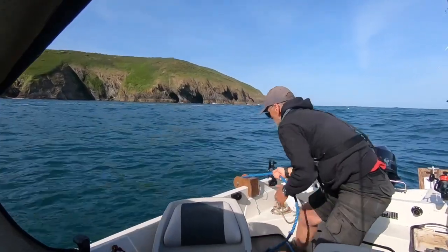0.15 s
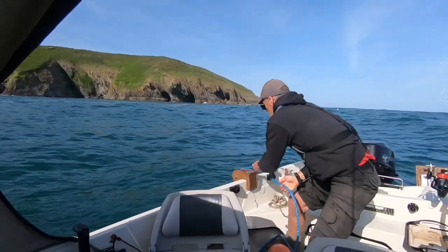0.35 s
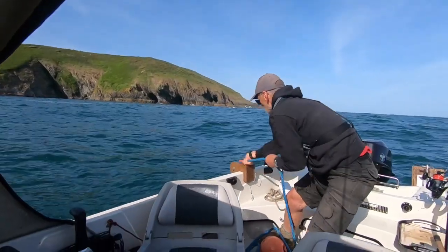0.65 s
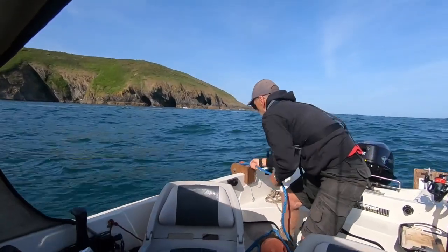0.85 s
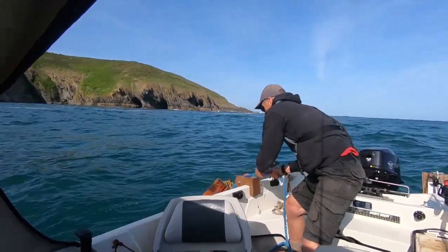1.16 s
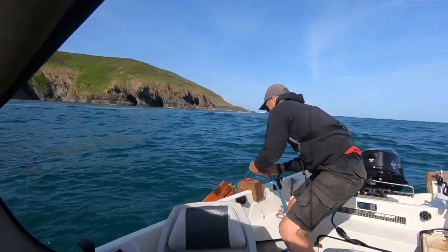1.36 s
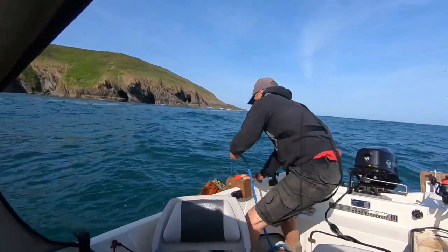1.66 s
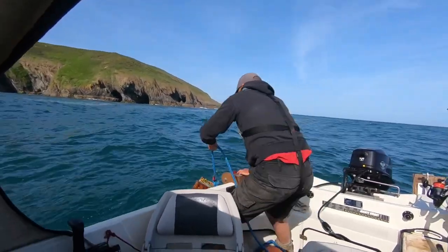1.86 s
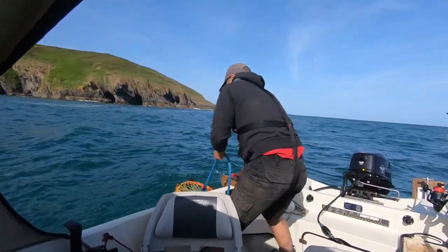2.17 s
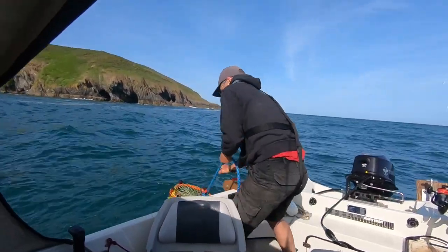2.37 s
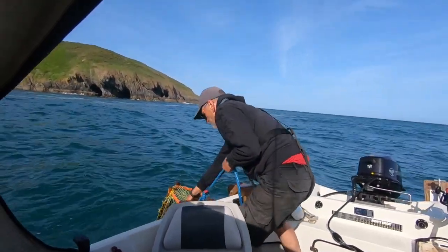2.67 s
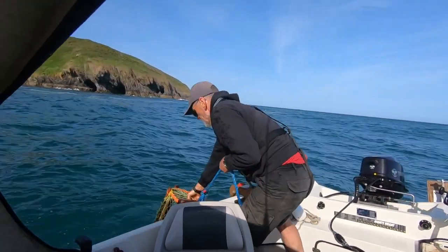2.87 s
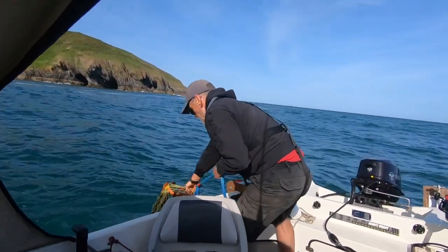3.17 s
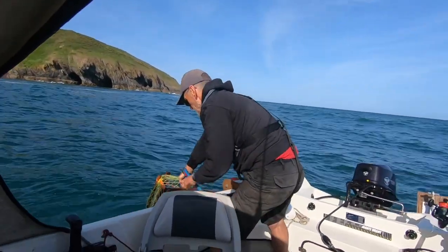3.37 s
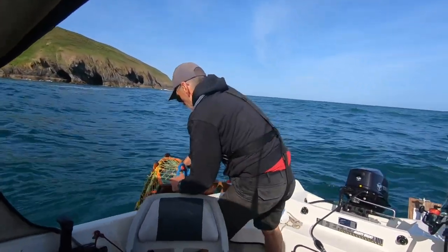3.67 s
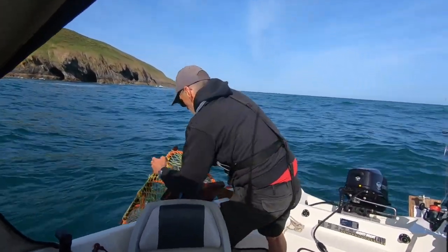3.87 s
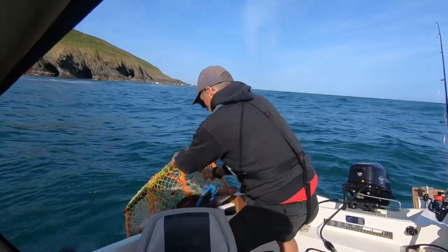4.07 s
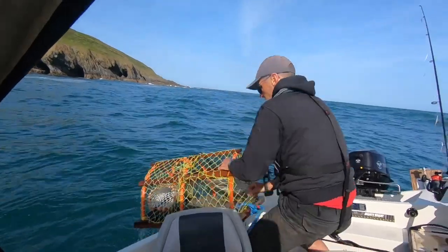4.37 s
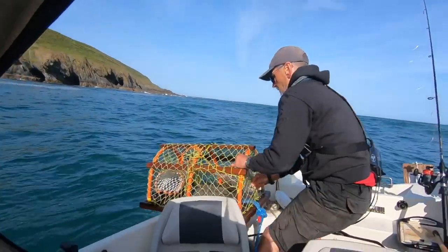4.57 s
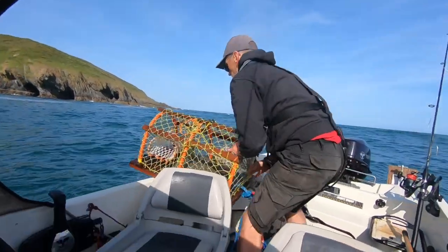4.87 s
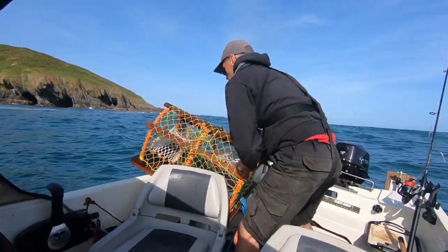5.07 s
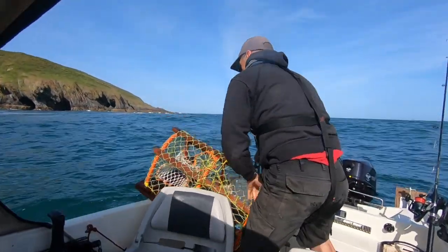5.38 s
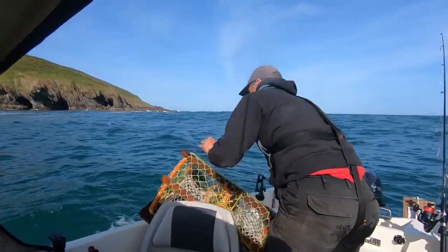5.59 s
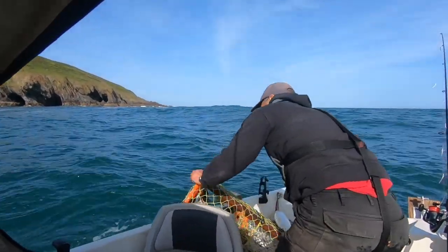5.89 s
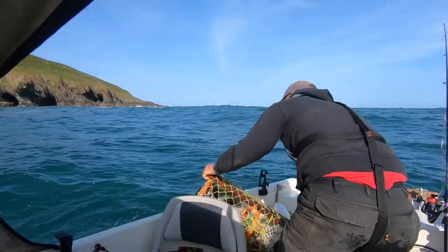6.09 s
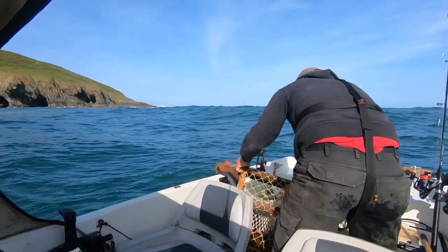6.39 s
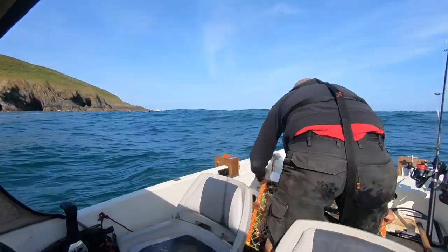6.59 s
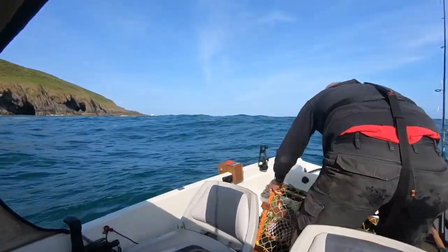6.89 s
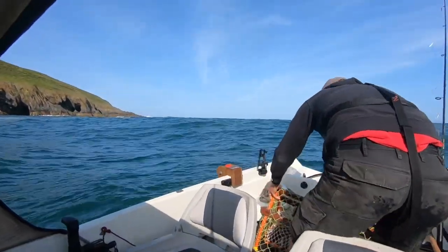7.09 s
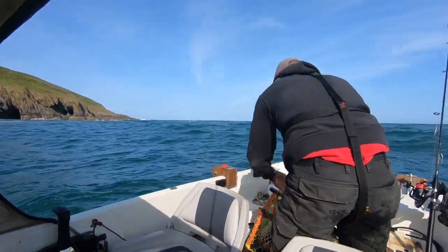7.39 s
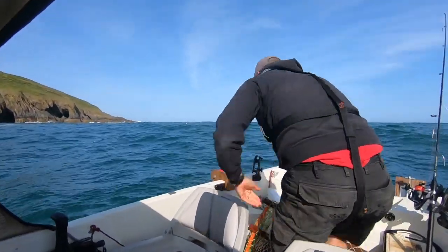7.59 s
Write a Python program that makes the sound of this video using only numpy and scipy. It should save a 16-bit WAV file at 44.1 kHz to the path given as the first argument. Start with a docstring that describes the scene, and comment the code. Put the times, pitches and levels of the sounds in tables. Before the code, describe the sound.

On a small fibreglass boat at sea, wet rope rasps and snaps between isolated hollow knocks. A framed netting trap then comes over the side with juddering scrapes, creaks and a brief squeak, ending in a dense clatter on the deck. Low hull rumble, wind and water wash and a faint outboard hum continue. Close, dry outdoor microphone on board.

```python
"""Hauling a lobster creel aboard

A creel is hauled up by rope and dragged over the side of a small fibreglass boat.
Boots and the creel's frame knock on the hull: each blow rings a set of fading tones and adds a noisy crack.
Wet rope and netting rasp, creak, snap and squeak over the gunwale, made from many tiny slips and noise bursts.
Shaped noise gives the hull's rumble in the swell and the rush of wind and sea; an outboard hums faintly.
"""
import sys
import numpy as np
from scipy import signal
from scipy.fft import rfft, irfft, next_fast_len
from scipy.io import wavfile
from scipy.ndimage import uniform_filter1d, map_coordinates

SR = 44100
rng = np.random.default_rng(int(sys.argv[2]) if len(sys.argv) > 2 else 0)


def digitize_waveform(pressure):
    """Quantize a signal to 16-bit integers and store it at the path in sys.argv[1].

    Rows of a 2-D input are taken as channels; values are limited to [-1, 1].
    """
    field = np.atleast_2d(pressure).T
    bounded = np.clip(field, -1, 1)
    quanta = np.round(bounded * 32767).astype(np.int16)
    wavfile.write(sys.argv[1], SR, quanta)


N = 341334
TIME = np.arange(N) / SR
RING = np.arange(SR // 2) / SR  # the clock of one short event [s]

# "re" means relative to; t60 is the time a sound takes to fade by 60 dB.
# blows on the hull: (time [s], thud level before the pitch loss [dB], crack re thud level [dB],
# favoured pitch [Hz])
KNOCKS = [(0.579, -13.5, -44, 284), (0.587, -8.5, -23, 233), (1.731, -0.5, -25, 269), (1.816, -9, -17, 240),
          (1.821, -11, -24, 635), (1.837, -11, -28, 295), (1.869, -6, -57, 269), (2.111, -10, -48, 203),
          (2.268, -9.5, -13, 212), (2.312, -7.5, -22, 231), (3.316, -21, -22.5, 583),
          (3.585, -15.5, -5.5, 540), (3.599, -23, -18, 480), (3.653, -16.5, -32, 555),
          (3.746, -10, -22.5, 135), (4.056, -8.5, -48, 175), (4.152, -12.5, -48, 164),
          (4.213, -11, -31, 216), (4.343, -12, -18, 155), (4.364, -14.5, -18, 318), (4.478, -26, -6.5, 600),
          (4.688, -14.5, -19, 211), (4.935, -6.5, -14, 223), (5.077, -15.5, -16.5, 205),
          (5.413, -14.5, -13.5, 556), (5.472, -7.5, -27, 465), (5.485, -6.5, -22.5, 194),
          (5.504, -16, -20.5, 630), (5.702, -8, -30, 313), (5.72, -11, -16.5, 238),
          (5.902, -8.5, -24.5, 465), (5.915, -12.5, -5.5, 540), (6.041, -16, -24, 164),
          (6.322, -13.5, -38, 149), (6.405, -7, -16, 220), (6.465, -6.5, -18, 119), (6.477, -7, -24.5, 430),
          (6.498, -16, -6.5, 600), (6.506, -15.5, -16, 325), (6.526, -12, -29, 200), (6.592, -8.5, -9, 433),
          (6.609, -12, -37, 237), (6.634, -15.5, -8.5, 1060), (6.646, -15.5, -17.5, 624),
          (6.665, -5.5, -16, 184), (6.682, -13, -23, 418), (6.735, -12.5, -18, 347),
          (6.757, -12.5, -13, 440), (6.8494, -6, -29, 620), (6.858, -9.5, -30, 450),
          (6.853, -14, -22.5, 900), (6.879, -11, -35, 159), (6.984, -4.5, -28, 430), (7.085, -23, -11, 720),
          (7.533, -16, -18, 457), (7.566, -18, -50, 143), (7.596, -15, -43, 190), (7.669, -13, -26, 790),
          (7.708, -9, -25, 143)]
# heavy landings of boots and creel on the deck: (time [s], level before a fixed cut [dB])
THUMPS = [(0.11, -9.5), (0.583, -6.5), (0.678, -13.5), (1.837, -16), (2.127, -6), (2.324, -6.5),
          (2.57, -10.5), (3.471, -11), (3.654, -7), (3.821, -6), (4.386, -9.5), (4.986, -11),
          (5.194, -10.5), (5.501, -9), (5.715, -7), (6.304, -7), (6.465, -16), (6.619, -5), (7.688, -12)]
# shoves that slide the creel aboard: (start [s], length [s], judder level [dB], grind re judder [dB])
SHOVES = [(3.46, 0.35, -31, -20.5), (3.713, 0.56, -22.5, -38), (4.191, 0.31, -20.5, -14),
          (4.506, 0.31, -35, -5), (5.142, 0.48, -30, -10.5), (5.668, 0.2, -23, -14.5),
          (6.299, 0.085, -24, -10.5), (6.445, 0.08, -21, -10), (6.576, 0.2, -21, -5),
          (6.795, 0.13, -20.5, -9), (6.991, 0.065, -32.5, -4.5), (7.552, 0.074, -17.5, -14),
          (7.667, 0.09, -30.5, 8.5)]
# hard little contacts of frame and fittings:
# (time [s], ring level [dB], body level [dB], tick level [dB], favoured pitch [Hz])
CLICKS = [(0.0677, -31.5, -60, -36, 3600), (0.6807, -36, -22, -49, 1800), (1.0133, -28, -54, -34.5, 2500),
          (1.7301, -18.5, -37, -49, 2720), (2.267, -30.5, -24, -48, 2670), (2.312, -24, -45, -53, 2620),
          (2.365, -26.5, -22, -32, 3900), (2.3769, -14, -12, -41.5, 4470), (2.38, -21, -19, -47, 2300),
          (2.613, -31.5, -36, -51, 2450), (2.953, -26, -37, -38, 2900), (3.0627, -31.5, -57, -42, 2480),
          (3.542, -21.5, -40, -34, 3180), (3.586, -26.5, -46, -40, 3080), (4.213, -25, -31, -46.5, 1760),
          (4.541, -33, -59, -38.5, 2880), (5.292, -40, -60, -42.5, 3800), (5.412, -31.5, -27, -55, 1740),
          (5.643, -37.5, -35, -34, 2000), (6.668, -24.5, -44, -32, 3850), (7.1411, -30.5, -43, -47.5, 2350)]
# dry snaps of rope, mesh and frame: (time [s], level [dB], centre pitch [Hz], t60 [s])
SNAPS = [(0.163, -35, 2940, 0.048), (0.6804, -20.5, 3500, 0.0096), (0.796, -33.5, 2930, 0.039),
         (1.198, -36.5, 3570, 0.034), (1.327, -30, 4200, 0.032), (1.338, -29, 4800, 0.034),
         (1.552, -30, 2610, 0.024), (1.7325, -18, 3500, 0.025), (2.3774, -15.5, 2800, 0.0085),
         (2.3812, -9.5, 1980, .013), (2.45, -31, 2800, 0.012), (2.741, -38, 3500, .04),
         (2.84, -39.5, 3400, 0.038), (2.951, -34, 2900, 0.016), (3.5855, -20.5, 2960, 0.021),
         (6.628, -18, 3040, 0.069), (6.83, -28.5, 3500, .035), (7.674, -35, 2960, 0.012)]
# rope and netting strokes: (start [s], length [s], level before a fixed cut [dB], hiss re rasp [dB])
RASPS = [(0.061, 0.044, -39, 1.5), (0.589, 0.06, -29.5, -16), (0.638, 0.058, -32, -20.5),
         (0.823, 0.13, -36, -23.5), (1.312, 0.044, -36, -8), (1.71, 0.045, -23, -26),
         (1.784, 0.12, -33.5, -11), (1.963, 0.086, -30.5, -17.5), (2.003, 0.12, -33.5, -11),
         (2.437, 0.084, -32.5, -25.5), (2.923, 0.16, -40, -20.5), (3.044, 0.057, -39.5, -10),
         (3.266, 0.22, -43, -32), (3.527, 0.06, -27.5, -15), (3.561, 0.04, -35, -19),
         (4.042, 0.36, -35, -19), (4.107, 0.068, -32.5, -17), (4.343, 0.072, -37, -10.5),
         (4.663, 0.1, -28.5, -15), (4.755, 0.094, -34, -9.5), (5.411, 0.15, -28, -14),
         (5.445, 0.15, -36, -6.5), (5.51, 0.042, -29.5, -2), (5.932, 0.082, -32, -12.5),
         (6.097, 0.2, -43.5, -5.5), (6.476, 0.12, -25.5, -18), (6.591, 0.19, -26, -13),
         (6.687, 0.12, -24.5, -18), (6.822, 0.041, -27, -15), (7.012, 0.057, -28, -41),
         (7.456, 0.12, -34.5, -14.5), (7.511, 0.056, -24.5, -19), (7.671, 0.057, -26.5, -6)]
# creaks of taut rope and mesh:
# (start [s], length [s], level [dB], first pitch [Hz], last pitch [Hz], width [Hz])
CREAKS = [(0.056, 0.055, -40, 3730, 3300, 910), (1.974, 0.04, -35.5, 2300, 2110, 600),
          (2.006, 0.033, -35, 2530, 3580, 805), (2.036, 0.04, -30, 3020, 2250, 650),
          (2.038, 0.054, -34.5, 4430, 3930, 905), (2.359, 0.045, -27, 1890, 2090, 504),
          (3.607, 0.073, -49, 2310, 2280, 300), (4.11, 0.044, -31, 2350, 2900, 700),
          (4.72, 0.035, -33, 3500, 4000, 696), (5.479, 0.065, -33, 1670, 1730, 250),
          (5.516, 0.041, -35, 3440, 3900, 1200), (5.945, 0.037, -25.5, 2400, 2740, 650),
          (5.946, 0.04, -31.5, 3540, 3940, 1010), (6.491, 0.035, -32, 4000, 3900, 800),
          (6.664, 0.11, -32.5, 2370, 2000, 600), (6.745, 0.037, -27, 3050, 2640, 710),
          (7.471, 0.068, -28, 2530, 2780, 900), (7.526, 0.024, -32, 2310, 2300, 250),
          (7.682, 0.048, -31, 2680, 2750, 250)]
# squeaks of wet plastic and rope: (start [s], length [s], level [dB], first pitch [Hz], last pitch [Hz])
SQUEAKS = [(4.119, 0.041, -26.5, 1840, 1985), (4.124, 0.042, -23.5, 2275, 2620),
           (4.163, 0.03, -34.5, 3850, 4200), (6.807, 0.065, -39, 7720, 8700)]
# sea and wind: (time [s], wash level [dB], fizz re wash [dB])
SEA = [(0, -30, 2), (.45, -34, 5.5), (.95, -33.5, 2.5), (1.5, -29, -1), (2, -32.5, 3.5), (2.75, -37.5, 6),
       (3.25, -33, -2.5), (4, -32.5, 0), (6.9, -35, -0.5), (7.25, -34, -7), (7.74, -35.5, 5)]
# hull rumble in the swell: (time [s], level before a fixed lift [dB])
SWELL = [(0.0, -27.5), (1.27, -33.5), (1.81, -31.5), (1.96, -28), (2.48, -23), (2.72, -31.5), (3.28, -35.5),
         (3.79, -23.5), (4.42, -18.5), (4.8, -33), (5.8, -22), (6.08, -29), (6.83, -23.5), (7.15, -34),
         (7.5, -39.5), (7.74, -16)]
# stereo width: (time [s], level [dB])
WIDTH = [(0, 1.5), (.75, 6), (1.05, -6), (1.3, -42), (7.74, -58)]

# ringing tones of the deck, hull, side panels, creel frame and the frame's duller body:
# (pitch [Hz], level [dB], t60 [s])
BOOM = [(42.5, -3.5, 0.3), (57, 2.5, 0.36), (76.6, 3, 0.21)]
HULL = [(120, -1, 0.34), (160.7, -1, 0.24), (184.5, -0.5, 0.19), (213, -1.5, 0.18), (243.4, -3.5, 0.095),
        (284.5, -4, 0.11), (324.3, -1.5, 0.19), (371.7, -5, 0.13), (434.3, -4.5, 0.14)]
PANEL = [(432.5, 3, 0.16), (484.2, 0, 0.15), (534, 2.5, 0.086), (619, 0, 0.14), (675, -4.5, 0.19),
         (752.4, -1, 0.12), (838.6, -4, 0.11), (900.4, -7.5, 0.21), (995, -7.5, 0.11), (1092, -9.5, 0.072)]
FRAME = [(1740, 1.5, 0.04), (1930, 5, 0.036), (2260, -8, 0.079), (2515, -3.5, 0.055), (2667, 4, 0.031),
         (2950, 0.5, 0.034), (3496, 5.5, 0.027), (3885, 6.5, 0.015), (4400, 0.5, 0.017), (5140, -4, 0.014),
         (5500, -11, 0.016)]
FRAME_BODY = [(646, -3, .05), (820, -3, .03), (985, -5, .03), (1135, -6, .045), (1310, -2, .02),
              (1470, 0, .022)]
# two panel tones that groan under the scraping frame: (pitch [Hz], level [dB], width [Hz])
GROAN = [(430.5, -2.5, 8), (630, -5.5, 9.7)]

# noise colours of the sea, hull rumble, contact crack, rope rasp, hiss and netting rustle:
# (frequency [Hz], level [dB])
WASH = [(70, -22), (130, -6.5), (180, -2), (290, -2.5), (400, -11), (600, -14.5), (1000, -26.5),
        (1350, -41), (1900, -33.5), (2500, -34.5), (4000, -45), (8000, -54), (11000, -64), (15000, -79)]
RUMBLE = [(11, -32.5), (18, 2), (27, -5), (43, -1), (60, 0), (70, -2), (97, -5.5), (160, -14.5),
          (210, -37.5), (350, -120)]
CRACK = [(500, -21), (1100, 6.5), (1400, 0), (1900, 6.5), (2700, 0.5), (4000, -6), (6500, -23.5),
         (8500, -20.5), (11000, -38), (15000, -49)]
RASP = [(600, 12), (1400, -3.5), (2000, 6.5), (2800, 4), (4000, -3.5), (6000, -25.5), (9000, -57),
        (15000, -61)]
HISS = [(2500, -10), (5000, 6), (8000, -0.5), (10000, -7.5), (13000, -23.5), (15000, -22)]
RUSTLE = [(710, -37), (1200, -6), (2120, 1.5), (2280, 3), (2460, 2.5), (6310, -14), (7570, -15.5),
          (12100, -35), (15500, -42.5)]
# how the stereo width depends on pitch: (frequency [Hz], side level [dB])
SPREAD = [(60, -21.5), (110, -16), (200, -26), (380, -23), (700, -11.5), (1290, 3.5), (2380, -11),
          (4400, -9), (8120, 0), (15000, 0)]
# reflections from the deck and the boat's sides: (delay [ms], gain [ratio])
WALLS = [(1.45, -0.051), (2.3, 0.0017), (3.7, 0.14), (5.9, 0.14), (8.6, -0.14), (13, 0.16)]

CLACK_DB, CLACK_PER_HARDNESS = -3, 0.32  # side panel re thud; dB gained per dB of hardness
CLACK_DB_PER_OCTAVE = 3.5  # a higher-pitched blow rings the panel more
HULL_KNEE_HZ, HULL_LOSS_DB_PER_OCTAVE = 333, 6  # and, above this pitch, the hull less
BOOM_DB, LOW_BLOW_HZ = -15.5, 203  # deck re thud; pitch at which the panel gains nothing
SHOVE_ATTACK_S, SHOVE_T60_S = 0.015, 0.25  # the creel starts to slide, and coasts to rest
CHATTER_RATE, CHATTER_DB = 60, 4  # catching and letting go: random turns a second, swing
GROAN_DB, RUSTLE_DB = -7, -12.5  # panel groan and netting, re grind
DRIFT_S, DRIFT_RATE = 0.003, 14  # time shift that bends the pitch; random turns a second
CLICK_CRACK_DB = -4  # contact noise re the frame's ring
SNAP_WIDTH, SNAP_TOP_HZ = 1.3, 8500  # width over centre pitch; wet rope deadens a snap above this
STROKE_RISE, STROKE_CURVE = 0.26, 0.97  # share of a stroke spent speeding up; how pointed its peak is
HANDLING_DB, HANDLING_SWING_DB = -62.5, 2  # rope and clothing; how far their level swings
TOP_HZ = 15400  # nothing sounds above this


def amp(db):
    """Turn decibels into a gain."""
    return 10 ** (np.asarray(db) / 20)


def unit(x):
    """Scale to an average (rms) strength of 1."""
    return x / np.sqrt(np.mean(x ** 2) + 1e-20)


def peaked(x):
    """Scale to a peak of 1."""
    return x / (np.abs(x).max() + 1e-20)


def curves(rows):
    """Join the rows by straight lines: one value per sample for each column after the time."""
    s, *columns = np.transpose(rows)
    return [np.interp(TIME, s, column) for column in columns]


def wobble(rate):
    """A smooth random curve with this many random points a second."""
    points = rng.standard_normal(int(N * rate / SR) + 4)
    return map_coordinates(points, [TIME * rate])


def filtered(x, response):
    """Make each frequency in x louder or softer, as the response says."""
    n = x.shape[-1]
    padded = next_fast_len(n + SR // 4)
    spectrum = rfft(x, padded) * response(np.fft.rfftfreq(padded, 1 / SR))
    return irfft(spectrum, padded)[..., :n]


def shape(points):
    """A response that joins (frequency [Hz], level [dB]) points, evenly by octave."""
    f, db = np.transpose(points)
    return lambda hz: amp(np.interp(np.log(hz + 1), np.log(f), db))


def resonance(hz, centre, width):
    """Response of one damped object that rings best at its centre pitch."""
    return 1j * hz * width / (centre ** 2 - hz ** 2 + 1j * hz * width)


def body(modes, width_hz):
    """Response of an object whose tones are all damped alike by what leans on it."""
    def response(hz):
        return sum((-1) ** k * amp(db) * resonance(hz, f, width_hz) for k, (f, db, t60) in enumerate(modes))
    return response


def add(track, s, sound):
    """Mix a sound into the track at s seconds."""
    part = track[max(round(s * SR), 0):][:len(sound)]
    part += sound[:len(part)]


def ring(modes, scatter_db, attack, favoured_hz=1000, favour_db=0):
    """One blow on an object: tones near the favoured pitch gain, and chance varies each one."""
    hz, db, t60 = np.transpose(modes)[:, :, None]
    size, detune, side = rng.standard_normal((3, len(modes), 1))
    favour = favour_db * np.exp(-(np.log(hz / favoured_hz) / 0.12) ** 2)
    waves = np.sign(side) * np.sin(2 * np.pi * hz * (1 + 0.017 * detune) * RING)
    fading = amp(db + favour + scatter_db * size - 60 * RING / t60)
    return peaked(np.sum(waves * fading, axis=0) * (1 - np.exp(-RING / attack)))


def burst(spectrum, attack, t60, tail_db, tail_t60):
    """Noise of a contact that beds in over a moment, and its short tail between the boat's sides."""
    noise = filtered(rng.standard_normal(len(RING)), shape(spectrum))
    rise = 1 - np.exp(-(RING / attack) ** 2)
    fade = amp(-60 * RING / t60) + amp(tail_db - 60 * RING / tail_t60)
    return peaked(noise * rise * fade)


def slips(n, rate, spread_db):
    """Rubbing that sticks and slips: about rate uneven impulses a second, at random times."""
    chance, size, side = rng.random(n), rng.standard_normal(n), rng.standard_normal(n)
    return (chance < rate / SR) * amp(spread_db * np.clip(size, -2, 2)) * np.sign(side)


def grit(n, rate, spread_db, grain_s):
    """Each slip lets go a tiny puff of noise."""
    decay = np.exp(-1 / (grain_s * SR))
    puffs = signal.lfilter([1], [1, -decay], np.abs(slips(n, rate, spread_db)))
    return unit(puffs * rng.standard_normal(n))


def stroke(t, length_s, rise):
    """Loudness of a rub that speeds up to a peak, slows and trails off."""
    turns = [0, np.clip(rise, .05, .95), 1, 2]
    return np.interp(t / length_s, turns, [0.021, 0.99, 0.075, 0.0043]) ** STROKE_CURVE


def cockpit(x):
    """Close, hard surfaces repeat a sound within milliseconds and colour it."""
    return x + sum(gain * np.interp(TIME - ms / 1000, TIME, x, left=0) for ms, gain in WALLS)


def drifting(x):
    """The creel's weight moves, so every resonance in x wanders a few percent in pitch."""
    return np.interp(TIME + DRIFT_S * wobble(DRIFT_RATE), TIME, x)


def knocks():
    """A blow cracks at the contact, rings the side panel and the hull, and slowly sets the deck booming."""
    out = np.zeros(N)
    for s, db, hardness_db, hz in KNOCKS:
        pitch_gain_db = CLACK_DB_PER_OCTAVE * np.log2(hz / LOW_BLOW_HZ)
        clack_db = CLACK_DB + CLACK_PER_HARDNESS * hardness_db + pitch_gain_db
        hull_db = -HULL_LOSS_DB_PER_OCTAVE * max(np.log2(hz / HULL_KNEE_HZ), 0)
        thud = ring(HULL, scatter_db=4.0, attack=0.0038, favoured_hz=hz, favour_db=11.0)
        boom = ring(BOOM, scatter_db=-1.5, attack=0.023)
        clack = ring(PANEL, scatter_db=1.5, attack=0.0022, favoured_hz=hz, favour_db=11.5)
        crack = burst(CRACK, attack=0.0025, t60=0.058, tail_db=-13.5, tail_t60=0.3)
        add(out, s, amp(db + hull_db) * thud)
        add(out, s, amp(db + BOOM_DB) * boom)
        add(out, s, amp(db + clack_db) * clack)
        add(out, s, amp(db + hardness_db) * crack)
    return out


def thumps():
    """A soft, heavy load moves only the deck's deepest tones."""
    out = np.zeros(N)
    for s, db in THUMPS:
        add(out, s, amp(db - 3.5) * ring(BOOM, scatter_db=-2.0, attack=0.018))
    return out


def shoves():
    """Strength of judder and of grind: each shove takes hold, keeps its speed and coasts to rest."""
    judder, grind = np.zeros((2, N))
    for start, length_s, db, grind_db in SHOVES:
        t = TIME - start
        coast_db = -60 * np.maximum(t - length_s, 0) / SHOVE_T60_S
        push = amp(db + coast_db) * np.clip(t / SHOVE_ATTACK_S, 0, 1)
        judder = np.maximum(judder, push)
        grind = np.maximum(grind, amp(grind_db) * push)
    return judder, grind


def drag():
    """The sliding creel judders, shakes the hull and makes the panel groan; its wet netting rustles."""
    judder_gain, grind_gain = shoves()
    chatter = unit(amp(CHATTER_DB * np.clip(wobble(CHATTER_RATE), -2, 1)))
    judder = filtered(slips(N, rate=330, spread_db=3.5), body(HULL, width_hz=31.4))
    judder_colour = [(60, 6.5), (130, 3.5), (200, 1.5), (400, -10.0), (900, -24.0), (2000, -27.0)]
    judder = unit(filtered(judder, shape(judder_colour)))
    catches = chatter * slips(N, rate=250, spread_db=-2.5)
    grind = filtered(catches, body(PANEL, width_hz=36))
    grind_colour = [(200, -11.5), (450, 0), (1000, 1.5), (1400, -8.0), (4000, -27.5)]
    grind = unit(filtered(grind, shape(grind_colour)))
    groan = unit(filtered(catches, lambda hz: sum(amp(db) * resonance(hz, f, width) for f, db, width in GROAN)))
    netting = filtered(grit(N, rate=1100, spread_db=31.0, grain_s=0.03), shape(RUSTLE))
    rustle = unit(chatter * netting)
    scrape = drifting(grind) + amp(GROAN_DB) * groan + amp(RUSTLE_DB) * cockpit(rustle)
    return judder_gain * drifting(judder) + grind_gain * scrape


def clicks():
    """Hard contacts ring the creel's frame briefly, each at its own spot, and shake its mesh."""
    out = np.zeros(N)
    for s, db, body_db, tick_db, hz in CLICKS:
        frame = ring(FRAME, scatter_db=5.5, attack=0.0025, favoured_hz=hz, favour_db=12.5)
        crack = burst(CRACK, attack=0.0016, t60=0.024, tail_db=-22, tail_t60=0.14)
        dry_knock = ring(FRAME_BODY, scatter_db=3, attack=.001)
        tick = burst(HISS, attack=0.003, t60=0.034, tail_db=-16.0, tail_t60=0.2)
        add(out, s, amp(db) * frame)
        add(out, s, amp(db + CLICK_CRACK_DB) * crack)
        add(out, s, amp(body_db) * dry_knock)
        add(out, s, amp(tick_db) * tick)
    return out


def snaps():
    """A strand or a corner lets go at once: a dry crack that starts at full force."""
    out = np.zeros(N)
    for s, db, centre_hz, t60 in SNAPS:
        def response(hz):
            deadening = (1 + (hz / SNAP_TOP_HZ) ** 2) ** 2
            return resonance(hz, centre_hz, SNAP_WIDTH * centre_hz) ** 2 / deadening
        puff = rng.standard_normal(len(RING)) * amp(-60 * RING / t60)
        add(out, s, amp(db) * peaked(filtered(puff, response)))
    return out


def rasps():
    """Rope and mesh slip in short gritty strokes."""
    out = np.zeros(N)
    for start, length_s, db, hiss_db in RASPS:
        fibres = grit(len(RING), rate=800, spread_db=6.5, grain_s=0.004)
        broad = unit(filtered(fibres, shape(RASP)))
        hiss = unit(filtered(fibres, shape(HISS)))
        envelope = stroke(RING, length_s, STROKE_RISE)
        add(out, start, envelope * amp(db - 2.23) * (broad + amp(hiss_db) * hiss))
    return out


def creaks():
    """Slips under load ring one tone of a strand, which glides as the strand tightens or slackens."""
    out = np.zeros(N)
    for start, length_s, db, first_hz, last_hz, width_hz in CREAKS:
        hz = np.interp(RING, [0, length_s], [first_hz, last_hz])
        # shift the slips down by the gliding pitch, let them ring, then shift them back up
        turn = np.exp(2j * np.pi * np.cumsum(hz) / SR)
        pole = np.exp(-np.pi * width_hz / SR)
        impulses = slips(len(RING), rate=1500, spread_db=3.5)
        strand = signal.lfilter([1], np.poly([pole, pole]), impulses / turn)
        envelope = stroke(RING, length_s, STROKE_RISE)
        creak = envelope * np.real(strand * turn)
        add(out, start, amp(db) * unit(creak) * np.sqrt(np.mean(envelope ** 2)))
    return out


def squeaks():
    """Where the slips lock into step, wet plastic squeaks: a thin, rough, gliding tone."""
    out, n = np.zeros(N), len(RING)
    for start, length_s, db, first_hz, last_hz in SQUEAKS:
        hz = np.interp(RING, [0, length_s], [first_hz, last_hz])
        rough_hz = hz * (1 + .035 * wobble(1100)[:n])
        phase = 2 * np.pi * np.cumsum(rough_hz) / SR
        catching = amp(5 * np.minimum(wobble(170)[:n], 0))
        tone = np.sin(phase) + amp(-12) * np.sin(1.6 * phase)
        add(out, start, catching * stroke(RING, length_s, rise=0.5) * amp(db) * tone)
    return out


def handling():
    """Wet rope and clothing rustle faintly throughout: tiny puffs of noise at an uneven level."""
    rustle = unit(filtered(grit(N, rate=270, spread_db=8.5, grain_s=0.0041), shape(RUSTLE)))
    return amp(HANDLING_DB + HANDLING_SWING_DB * np.minimum(wobble(22), 2)) * rustle


def bubbles(rate, centre_hz, cycles, spread_db):
    """Small bubbles and drips: each rings for some cycles and rises in pitch."""
    out, t = np.zeros(N), RING[:SR // 25]
    for when, pitch, size in rng.random((int(rate * N / SR), 3)):
        hz = centre_hz * 2 ** (1.7 * (pitch - .5))
        age = t * hz / cycles
        envelope = age * np.exp(-2 * age)
        tone = np.sin(2 * np.pi * hz * t * (1 + 0.012 * age))
        add(out, when * N / SR, amp(spread_db * size ** 3) * envelope * tone)
    return unit(out)


def sea():
    """Wind and water wash round the boat, foam fizzes, bubbles prickle, and the hull rumbles in the swell."""
    wash_db, fizz_db = curves(SEA)
    rumble_db, = curves(SWELL)
    noise = unit(filtered(rng.standard_normal(N), shape(WASH)))
    slosh = filtered(noise, lambda hz: 1 / (1 + (hz / 1100) ** 4))
    fizz = noise - slosh
    slosh_gain = amp(1.2 * wobble(3.62) + 2.6 * np.minimum(wobble(28), 1))
    wash = slosh_gain * slosh + amp(fizz_db + 1.4 * wobble(3.5)) * fizz
    prickle = amp(-28.5) * bubbles(rate=230, centre_hz=2400, cycles=6, spread_db=12)
    rumble = unit(filtered(rng.standard_normal(N), shape(RUMBLE)))
    # even the rumble out, so that the swell sets its level
    recent_power = np.abs(uniform_filter1d(rumble ** 2, size=SR // 10))
    rumble /= np.sqrt(recent_power + 0.085)
    return amp(wash_db) * (wash + prickle) + amp(rumble_db + 1.5 + 0.47 * wobble(17)) * rumble


def outboard():
    """The idling outboard: one faint hum, unsteady in pitch and level."""
    hum_hz = 291.6 * (1 + 0.011 * wobble(14))
    phase = 2 * np.pi * np.cumsum(hum_hz) / SR
    return amp(-39.0 + 5.3 * wobble(21)) * np.sin(phase)


def scene():
    """Everything sounds from straight ahead; the stereo image is wide at first and then narrows."""
    close = cockpit(clicks() + snaps() + rasps() + creaks() + handling())
    mid = knocks() + thumps() + close + drag() + squeaks() + sea() + outboard()
    width_db, = curves(WIDTH)
    lag_s = .0031

    # early and late copies of opposite sign widen the image without tipping it to one side
    def widening(hz):
        return shape(SPREAD)(hz) * 1j * np.sqrt(2) * np.sin(2 * np.pi * hz * lag_s)
    side = amp(width_db) * filtered(mid, widening)
    return np.array([mid + side, mid - side])


def record(dry):
    """Round off the highest peaks smoothly and remove everything from the top frequency up."""
    rounded = dry / (1 + np.abs(dry / .8) ** 6) ** (1 / 6)
    return filtered(rounded, lambda hz: hz < TOP_HZ)


dry = scene()
out = record(dry)
digitize_waveform(out)
```